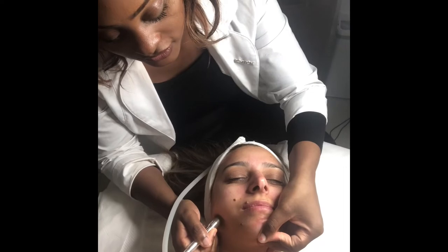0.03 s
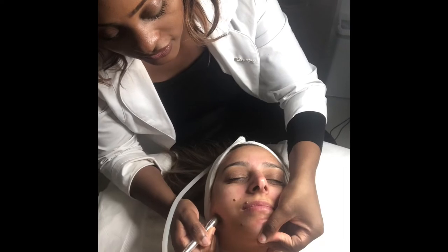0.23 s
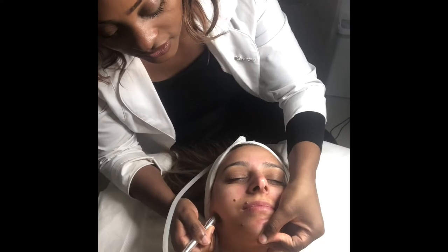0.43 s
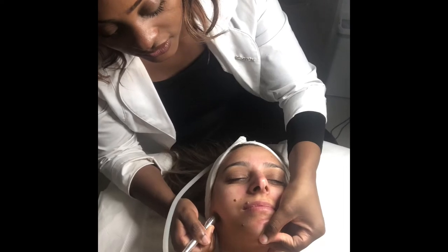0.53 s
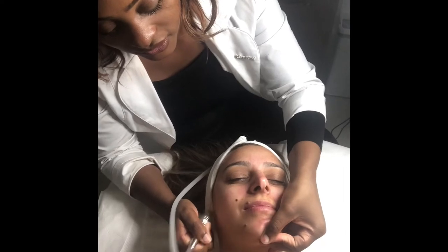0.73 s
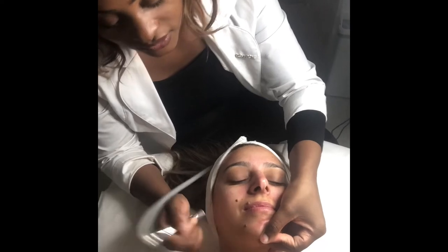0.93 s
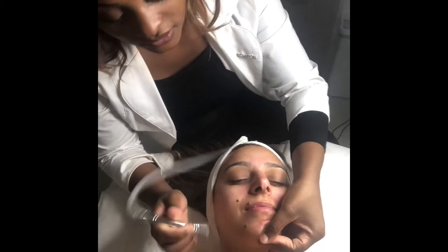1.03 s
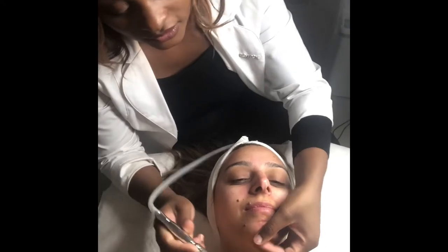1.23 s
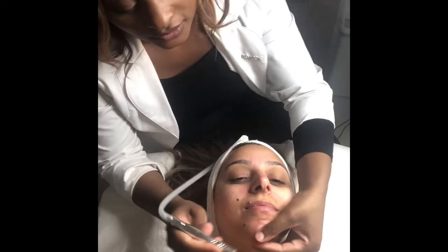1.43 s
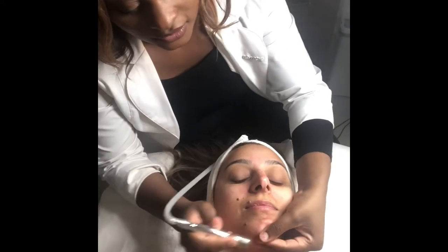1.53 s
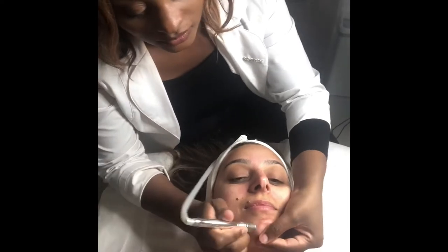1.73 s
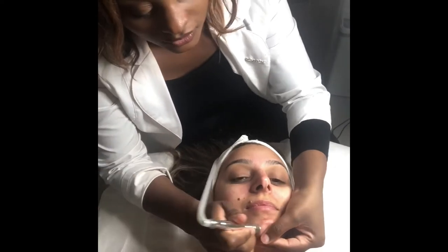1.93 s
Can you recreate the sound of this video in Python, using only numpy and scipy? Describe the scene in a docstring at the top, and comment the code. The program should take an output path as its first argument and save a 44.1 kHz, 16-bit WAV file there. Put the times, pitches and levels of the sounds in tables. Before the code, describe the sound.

Steady low motor hum and light rattle of a suction pump in a small room; midway a soft click and short hiss, then faint fluttering puffs and a low scuff at the end, close microphone.

```python
"""A small vacuum pump runs at about 40 strokes a second, as stroke-rate partials plus housing rattle.
Its motor adds a 120 Hz mains hum with two harmonics; filtered noise makes the steady air sound.
A suction wand sealed on skin hisses thinly, then lifts off with small pops and a short rush of air.
The open line shifts the pump's tone, and the tip puffs with each stroke when close to the skin.
A low scuff swells toward the end as the wand comes down."""
import sys
import numpy as np
from scipy import signal
from scipy.fft import rfft, irfft
from scipy.io import wavfile

SR = 44100
rng = np.random.default_rng(int(sys.argv[2]) if len(sys.argv) > 2 else 0)


def file_out(sig):
    """Save sig as 16-bit WAV at sys.argv[1]."""
    # one column per channel
    cols = np.atleast_2d(sig).T
    # limit, then scale
    lim = np.clip(cols, -1, 1)
    pcm = np.round(lim * 32767).astype(np.int16)
    wavfile.write(sys.argv[1], SR, pcm)


N = 88200
T = np.arange(N) / SR


def amp(db):
    """Decibels to gain."""
    return 10 ** (np.asarray(db) / 20)


def unit(x):
    """Scales to rms 1."""
    return x / np.sqrt(np.mean(x ** 2) + 1e-20)


def filtered(x, gain):
    """Applies a zero-phase gain given as a function of frequency in Hz."""
    return irfft(rfft(x) * gain(np.fft.rfftfreq(N, 1 / SR)), N)


def noise(points):
    """Noise of rms 1, its spectrum interpolated over log frequency."""
    hz, density_db = np.transpose(points)
    white = rng.standard_normal(N)
    return unit(filtered(white, lambda f: amp(np.interp(np.log(f + 1), np.log(hz), density_db))))


def drift(rate_hz):
    """Random wander of rms 1, Gaussian lowpass at rate_hz, no DC."""
    return unit(filtered(rng.standard_normal(N), lambda f: np.exp(-(f / rate_hz) ** 2) * (f > 0)))


def resonate(x, hz, width_hz):
    """A steep-sided resonance, rms 1."""
    return unit(filtered(x, lambda f: 1 / (1 + ((f - hz) / width_hz) ** 2) ** 2))


SEALED_HZ, OPEN_HZ = 40.62, 40.28  # strokes per second
STROKE_AT_S = 1.034  # one intake stroke
WOBBLE_HZ, WOBBLE_SHARE, JITTER_SHARE = 3.9, 0.0014, 0.0026  # shares of the speed


def strokes(opened):
    """Counts pump strokes; the speed follows the load and wobbles slightly."""
    speed_hz = SEALED_HZ + (OPEN_HZ - SEALED_HZ) * opened
    wobble = WOBBLE_SHARE * np.sin(2 * np.pi * WOBBLE_HZ * T)
    jitter = JITTER_SHARE * drift(rate_hz=43)
    turns = np.cumsum(speed_hz * (1 + wobble + jitter)) / SR
    return turns - np.interp(STROKE_AT_S, T, turns)


HUM_HZ = 120


def slip(turns, crest_s):
    """Cycles that the motor hum gains on three pump strokes, counted from a crest of their beat."""
    lead = HUM_HZ * T - 3 * turns
    return lead - np.interp(crest_s, T, lead)


# pump partials: order (multiple of stroke rate), sealed_db, open_db
PUMP_PARTIALS = [(2, -57, -59), (4, -57.5, -58), (5, -52, -55.5), (6, -56.5, -64), (7, -64, -60),
                 (8, -62.5, -67), (9, -77, -96), (10, -67, -70), (11, -67, -63), (12, -62.5, -72),
                 (13, -60.5, -60.5), (14, -73, -67), (15, -67, -62), (16, -66, -66), (17, -62.5, -66),
                 (18, -57.5, -56.5), (19, -67, -74), (20, -72, -74), (21, -69.5, -71), (22, -66, -75),
                 (23, -70, -69.5), (24, -73, -71), (25, -65.5, -69), (26, -69, -71), (27, -75, -61.5),
                 (28, -69, -70), (29, -73, -72.5), (32, -71.5, -76), (35, -79, -71), (37, -84, -73.5),
                 (39, -70.5, -83), (47, -71, -73.5), (48, -83, -69), (49, -70.5, -65.5), (51, -86, -72),
                 (52, -70.5, -78), (56, -76.5, -76.5)]
# partials beating with the hum while sealed: order, beats_per_slip_cycle, depth (0-1), crest_s
HUM_BEATS = [(4, 2, .6, 0.255), (5, 1, 0.6, 0.52)]
# partials that sing out briefly: order, peak_s, half_length_s, lift_db
PARTIAL_SWELLS = [(24, 1.034, 0.13, 13), (27, 1.65, .1, 5), (56, .23, 0.086, 12.5)]


def pump(turns, opened, phases, waver_db=2.0, sway_strokes=0.0021):
    """The throb of the pump: partials of the stroke rate, shifting in balance as the line opens."""
    beating = {order: 1 + depth * np.exp(2j * np.pi * beats * slip(turns, crest_s))
               for order, beats, depth, crest_s in HUM_BEATS}
    lift = {order: lift_db * np.exp(-((T - peak_s) / half_s) ** 2)
            for order, peak_s, half_s, lift_db in PARTIAL_SWELLS}
    out = np.zeros(N)
    for order, sealed_db, open_db in PUMP_PARTIALS:
        level_db = sealed_db + (open_db - sealed_db) * opened
        level_db = level_db + lift.get(order, 0) + waver_db * drift(rate_hz=17)
        beat = opened + (1 - opened) * beating.get(order, 1)
        cycles = order * (turns + sway_strokes * drift(rate_hz=5.5)) + phases[order]
        out += amp(level_db) * np.sqrt(2) * (beat * np.exp(2j * np.pi * cycles)).real
    return out


# housing resonances: centre_hz, width_hz, sealed_db, open_db
HOUSING_MODES = [(1315, 260, -72, -85), (1557, 350, -68.5, -67.5), (1926, 95, -73, -78),
                 (2223, 87, -76, -74.5), (4060, 1050, -78, -73.5)]
RATTLE_ROUGH = 0.26  # power share of noise in the drive


def rattle(turns, opened):
    """Valve beats, mostly regular and a little rough, ring the housing."""
    beats = np.zeros(N)
    for order in range(30, 130):
        beats += rng.rayleigh() * np.cos(2 * np.pi * (order * turns + rng.random()))
    beats = unit(beats)
    grit = rng.standard_normal(N) * (1 - 0.47 * np.cos(2 * np.pi * turns))
    out = np.zeros(N)
    for hz, width_hz, sealed_db, open_db in HOUSING_MODES:
        regular = np.sqrt(1 - RATTLE_ROUGH) * resonate(beats, hz, width_hz)
        rough = np.sqrt(RATTLE_ROUGH) * resonate(grit, hz, width_hz)
        out += (regular + rough) * amp(sealed_db + (open_db - sealed_db) * opened)
    return out


# motor hum levels over time: time_s, partial_1_db, partial_2_db, partial_3_db
HUM_LEVELS = [(0, -48, -42, -50), (.9, -48, -40.5, -49), (1.12, -51, -44.5, -51), (1.349, -46, -41, -49.5),
              (1.57, -44, -49.5, -49.5), (1.8, -47, -40, -49.5), (2, -47, -37.5, -49.5)]
HUM_CREST_S = 0.376


def hum(turns, phases):
    """The motor's magnetic hum at HUM_HZ and two harmonics, phased against every third pump order."""
    time_s, *levels = np.transpose(HUM_LEVELS)
    cycles = 3 * turns + slip(turns, HUM_CREST_S)  # stroke terms cancel: steady pitch
    out = np.zeros(N)
    for k, level_db in enumerate(levels, 1):
        tone = np.cos(2 * np.pi * (k * cycles + phases[3 * k]))
        out += amp(np.interp(T, time_s, level_db)) * np.sqrt(2) * tone
    return out


ECHO_SHARE, ECHO_DELAY_S, ECHO_DECAY_S = 0.3, .003, 0.0045  # share of power


def reflected(x, size=2500):
    """Short reflections off nearby surfaces give steady noise a finely rippled spectrum."""
    tail = rng.standard_normal(size) * np.exp(-T[:size] / ECHO_DECAY_S) * (T[:size] > ECHO_DELAY_S)
    echo = signal.fftconvolve(x, tail / np.linalg.norm(tail))[:N]
    return np.sqrt(1 - ECHO_SHARE) * x + np.sqrt(ECHO_SHARE) * echo


# room and motor air noise: freq_hz, density_db (per Hz, relative)
AIR_SPECTRUM = [(20, -34), (30, -25), (45, -8.5), (100, -4), (230, -2.5), (420, -11.5), (800, -10.5),
                (1500, -14.5), (2100, -18.5), (2700, -17), (4200, -19), (5400, -21), (6100, -24.5),
                (7200, -23), (8300, -31.5), (9600, -27.5), (10500, -33.5), (15500, -38.5)]
AIR_DB = -54.5
# thin hiss of the sealed tip: freq_hz, density_db (per Hz, relative)
LEAK_SPECTRUM = [(1500, -20), (4000, -23), (8000, -2), (11000, -2.5), (14500, -2.5), (15500, -0.5)]
LEAK_DB = -65


def air(turns, opened, throb=0.034, split_hz=1500):
    """Air noise throbbing with the strokes, and the hiss that stops when the seal is lost."""
    wash = amp(AIR_DB) * noise(AIR_SPECTRUM) * (1 + throb * np.cos(2 * np.pi * turns))
    wash = wash + amp(LEAK_DB) * noise(LEAK_SPECTRUM) * (1 - opened)
    low = filtered(wash, lambda f: 1 / (1 + (f / split_hz) ** 8))
    return low + reflected(wash - low)


# lip of the tip unsticking: start_s, centre_hz, width_hz, level_db, decay_s
LIP_SMACKS = [(.757, 12000, 7000, -48.5, 0.0017), (.7732, 3650, 1130, -31.5, 0.0012),
              (.783, 7600, 900, -47, 0.0043), (0.81, 7640, 1500, -44, 0.0045)]


def smacks():
    """Tiny decaying bursts of resonant noise as the skin lets go of the tip."""
    out = np.zeros(N)
    for start_s, hz, width_hz, level_db, decay_s in LIP_SMACKS:
        shape = (T >= start_s) * np.exp(-abs(T - start_s) / decay_s)
        burst = resonate(rng.standard_normal(N) * shape, hz, width_hz)
        out += amp(level_db) * np.sqrt(np.mean(shape ** 2)) * burst
    return out


# rush of air at lift-off: freq_hz, density_db (per Hz, relative)
RUSH_SPECTRUM = [(800, -40), (2200, -6), (2900, -19), (3700, 0), (4700, -5), (5300, -1), (6500, -8.5),
                 (7400, 1.5), (8000, -1), (8800, -13.5), (10800, -11.5), (12000, -19), (13200, -12.5),
                 (15500, -20)]
RUSH_S, RUSH_ATTACK_S, RUSH_HOLD_S, RUSH_DB = .765, 0.012, .012, -41
RUSH_FALL_DB_PER_S, TREBLE_FALL_DB_PER_S, TREBLE_HZ = 254, 478, 8800


def rush(flutter_db=1.6):
    """Air floods the wand; the treble dies first as the vacuum is spent."""
    age_s = T - RUSH_S
    late_s = np.maximum(age_s - RUSH_ATTACK_S - RUSH_HOLD_S, 0)
    jet = noise(RUSH_SPECTRUM)
    treble = filtered(jet, lambda f: 1 - 1 / (1 + (f / TREBLE_HZ) ** 10))
    body = (jet - treble) * amp(-RUSH_FALL_DB_PER_S * late_s)
    treble = treble * amp(-TREBLE_FALL_DB_PER_S * late_s)
    attack = np.clip(age_s / RUSH_ATTACK_S, 0, 1)
    return (body + treble) * attack * amp(RUSH_DB + flutter_db * drift(rate_hz=430))


# tip close to the skin: peak_s, swell_s, fade_s, level_db
NEAR_SKIN_RUNS = [(1.03, 0.058, 0.038, -49.5), (1.97, 0.13, 0.076, -52.5)]
# puff noise: freq_hz, density_db (per Hz, relative)
PUFF_SPECTRUM = [(800, -6), (2300, -13), (3200, -6), (4000, 3), (4700, -4), (5500, 5), (6400, -4.5),
                 (7500, -3), (8400, -13.5), (10700, -14.5), (15500, -26)]
PUFF_SHARP = 2.5  # higher is a narrower pulse


def puffs(turns):
    """Each intake stroke draws a puff through the narrow gap at the tip."""
    near = np.zeros(N)
    for peak_s, swell_s, fade_s, level_db in NEAR_SKIN_RUNS:
        near += amp(level_db) * np.exp(np.minimum((T - peak_s) / swell_s, (peak_s - T) / fade_s))
    pulse = np.exp(PUFF_SHARP * (np.cos(2 * np.pi * turns) - 1) / 2)
    return near * pulse * noise(PUFF_SPECTRUM)


# low rub of the tip on skin: freq_hz, density_db (per Hz, relative)
RUB_SPECTRUM = [(25, -13), (90, -5), (165, 7), (260, -6), (420, -12), (700, -21), (1500, -44), (2500, -17),
                (3300, -29), (8000, -62)]
RUB_S, RUB_SWELL_S, RUB_DB = 2.006, 0.13, -44.5  # full level falls just past the end


def rub():
    """A soft low scuff, exponentially swelling noise, as the wand comes down."""
    return amp(RUB_DB) * np.exp(np.minimum(T - RUB_S, 0) / RUB_SWELL_S) * noise(RUB_SPECTRUM)


LIFT_S, SETTLE_S = .80, .14  # pump starts to respond to lift-off; time to settle


def scene():
    """Pump, motor and wand, heard from one place."""
    opened = np.clip((T - LIFT_S) / SETTLE_S, 0, 1)  # 0 sealed, 1 open
    turns = strokes(opened)
    phases = rng.random(size=64)  # cycles
    machine = pump(turns, opened, phases) + rattle(turns, opened) + hum(turns, phases)
    wand = smacks() + rush() + puffs(turns) + rub()
    return (machine + air(turns, opened) + wand)[None]


EDGE_HZ = 15800


def record(dry):
    """Linear-phase lowpass at EDGE_HZ, with 2 ms fades at the ends."""
    ends = np.clip(np.minimum(T, T[::-1]) / .002, 0, 1)
    lowpass = signal.firwin(511, EDGE_HZ, window=("kaiser", 9), fs=SR)
    return signal.oaconvolve(dry * ends, lowpass[None], "same")


dry = scene()
out = record(dry)
file_out(out)
```